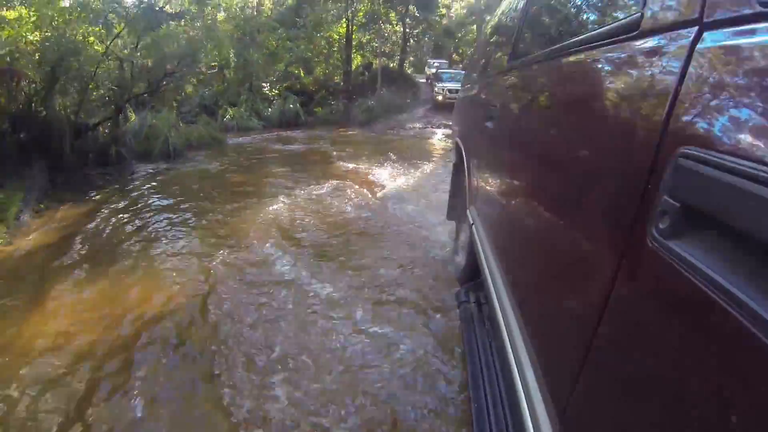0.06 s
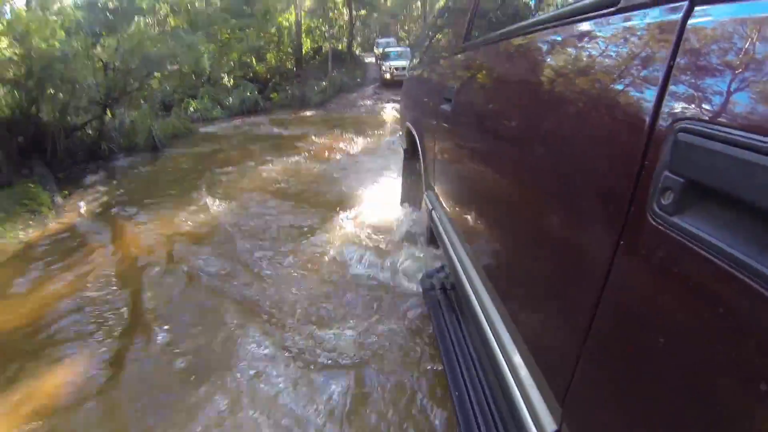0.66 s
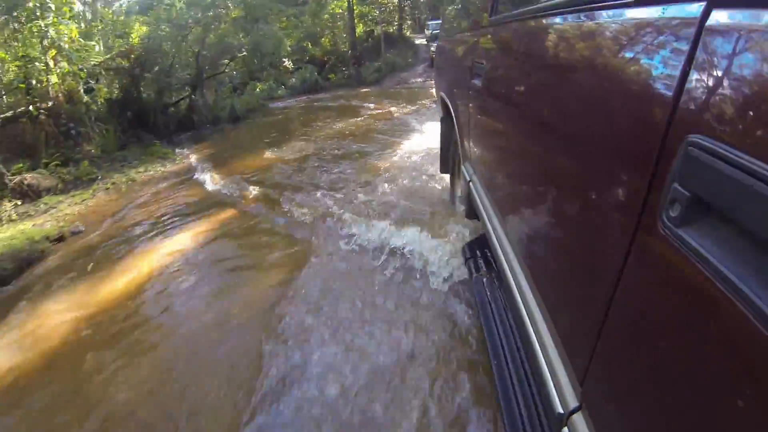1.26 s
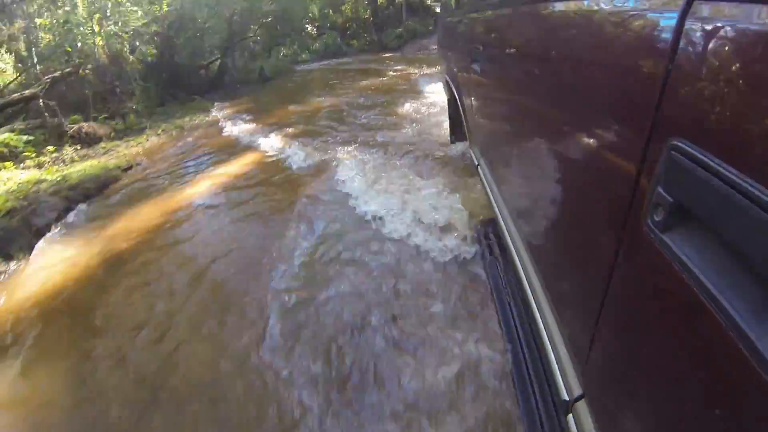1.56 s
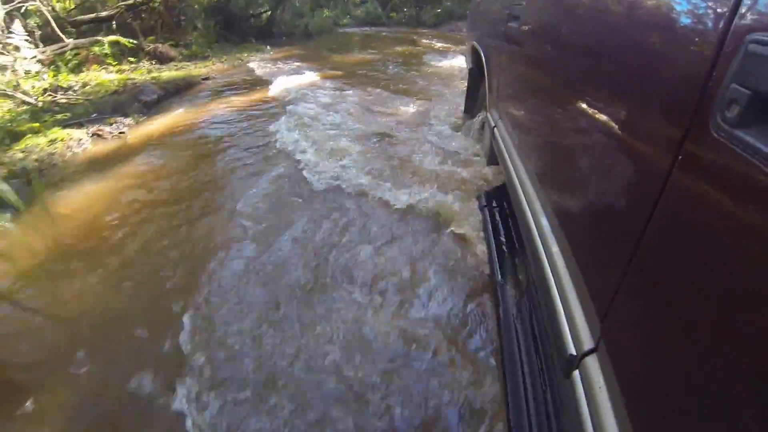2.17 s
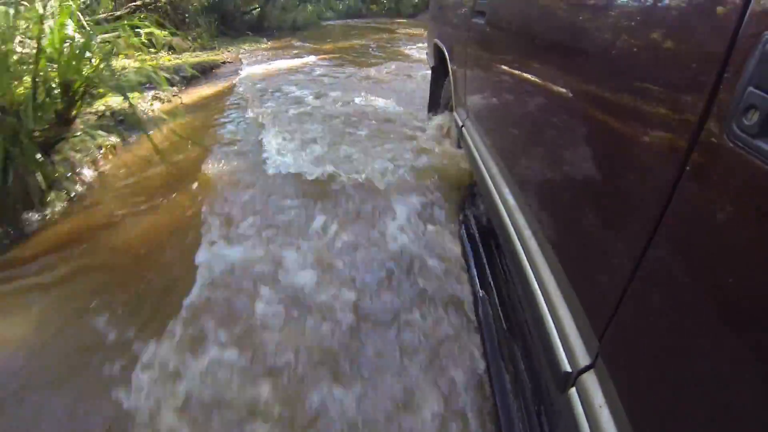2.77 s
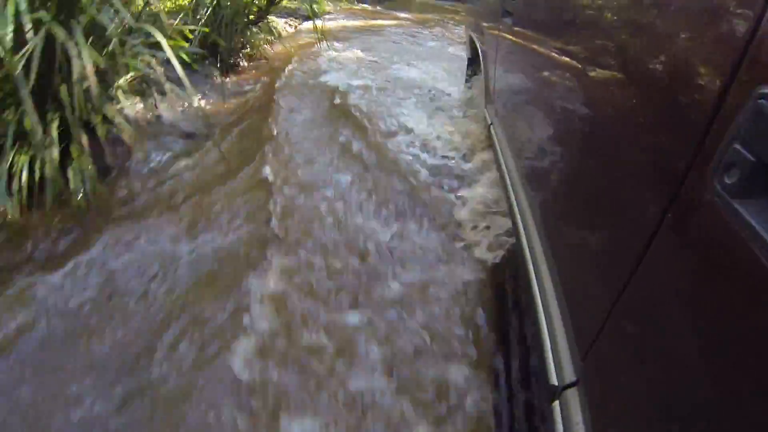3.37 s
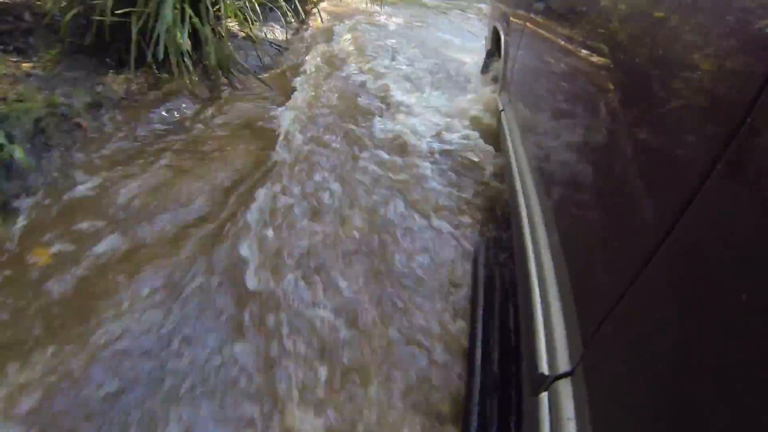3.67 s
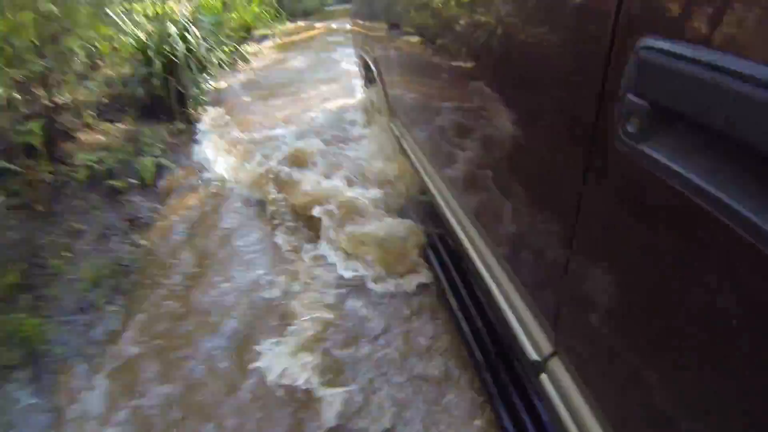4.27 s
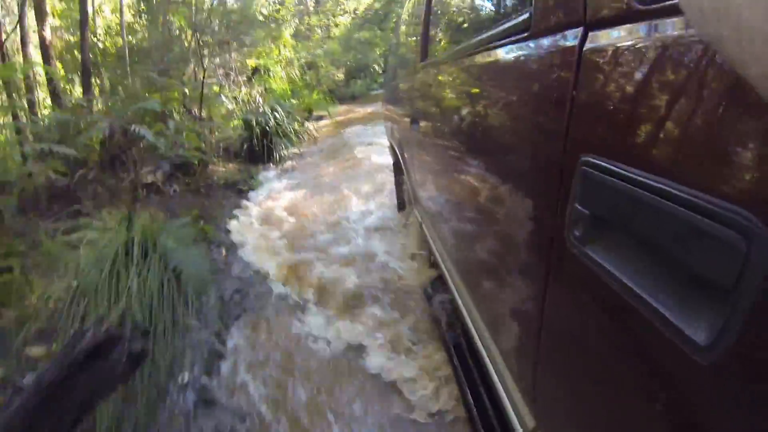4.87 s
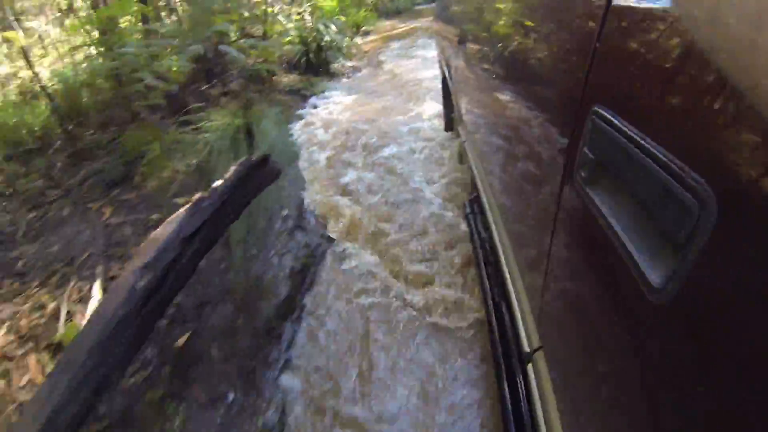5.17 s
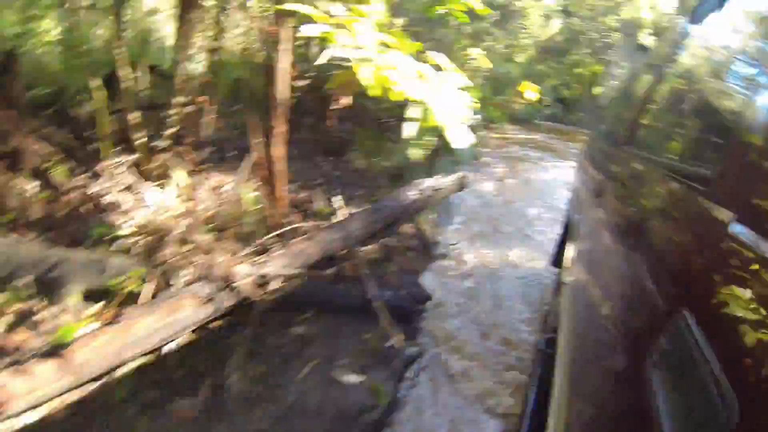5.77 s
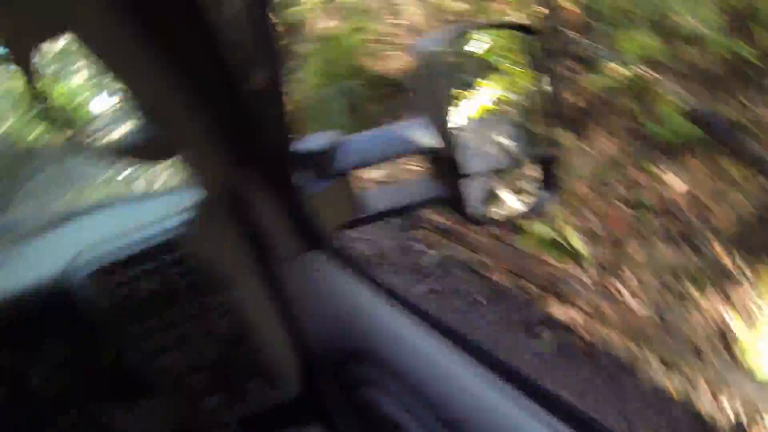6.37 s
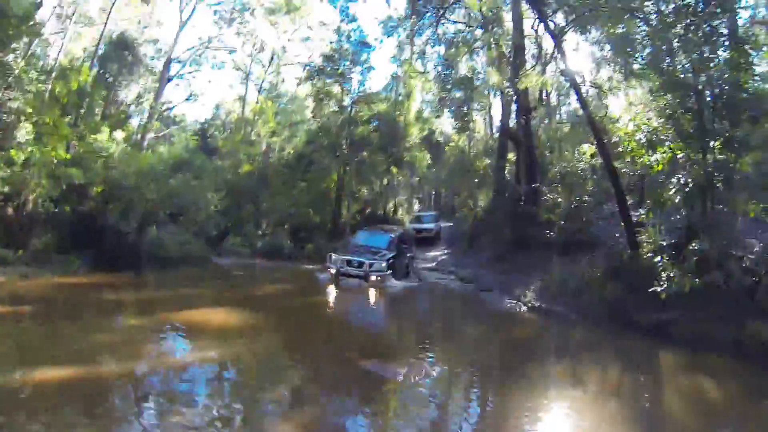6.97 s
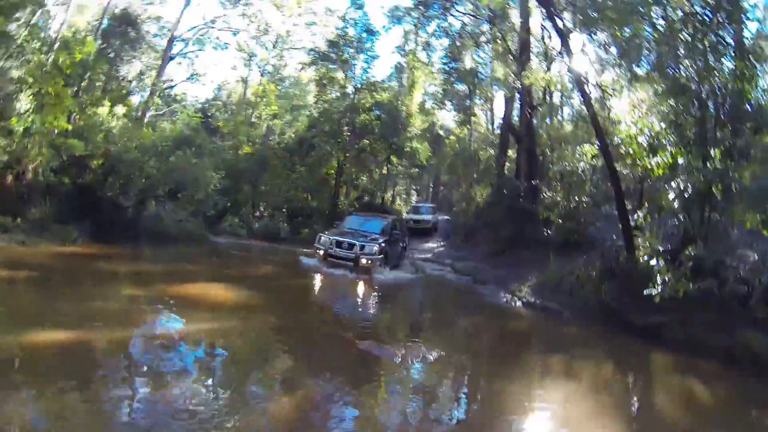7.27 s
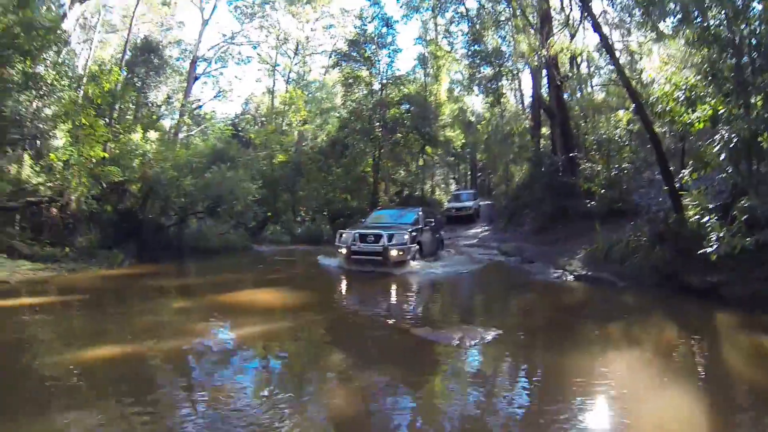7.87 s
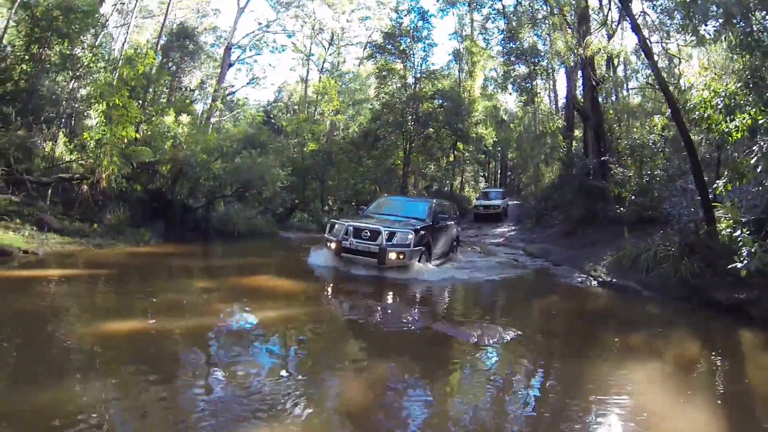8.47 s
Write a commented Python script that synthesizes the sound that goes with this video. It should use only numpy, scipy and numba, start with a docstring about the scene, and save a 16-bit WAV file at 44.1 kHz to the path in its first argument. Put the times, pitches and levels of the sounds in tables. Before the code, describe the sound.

Close V8 exhaust rumble, churning water and wind buffeting, cut off by a click, then another vehicle wading closer, heard from the bank.

```python
"""A V8 four-wheel drive wades through a creek, its uneven exhaust beats booming through the body.
The wheels churn up bubbles and spray. We listen from a plastic case held out of the window:
wind thumps on it, drops tick on it, and fingers tap it as it is drawn into the cab.
After a click the scene changes to the bank, where the next vehicle drones closer, pushing a bow wave."""
import sys
import numpy as np
from scipy import signal
from scipy.fft import rfft, irfft, next_fast_len
from scipy.io import wavfile
from scipy.ndimage import uniform_filter1d
from numba import njit

SR = 44100
rng = np.random.default_rng(int(sys.argv[2]) if len(sys.argv) > 2 else 0)


def bounce(signal):
    """Save signal as a 16-bit WAV file at the path given by the first command-line argument."""
    frames = np.transpose(np.atleast_2d(signal))
    limited = np.clip(frames, -1, 1)
    pcm = np.round(limited * 32767).astype(np.int16)
    wavfile.write(sys.argv[1], SR, pcm)


N = 384552
TIME = np.arange(N) / SR
RIDE_END_S, BANK_START_S = 6.743, 6.755
TOP_HZ = 15000

# The V8's speed. Each row: time in seconds, firings per second.
ENGINE_REVS = [(0, 70.25), (.2, 88.6), (.4, 99.3), (.65, 91.6), (.95, 59.2), (1.5, 50.64), (1.98, 48.32),
               (2.36, 109), (2.6, 109.8), (2.8, 114.7), (3, 109.4), (3.3, 94.3), (3.66, 112.6),
               (4.1, 90.44), (4.3, 77.84), (4.93, 66.04), (5.32, 95.54), (5.6, 95.4), (5.95, 104.2),
               (6.4, 91.8), (6.72, 89.5)]
# The exhaust's tones. Each row: multiple of the engine cycle (eight firings),
# relative level in dB when burbling, the same when running evenly.
EXHAUST_TONES = [(3.0, -12.5, -19), (4.0, -60.5, -28), (5.0, 4, -5), (6.0, -10.5, -15), (7.0, -29, -33.5),
                 (8.0, -0.5, 6.5), (9.0, -3, -51), (10.0, -1.5, -46.5), (11.0, -12, -4),
                 (12.0, -24.5, -10.5), (13.0, -2.5, -9.5), (14.0, -13, -24.5), (15.0, -5.5, -58.5),
                 (16.0, -3, -19), (17.0, -30, -10), (18.0, -7.5, -44.5), (19.0, -26.5, -43),
                 (20.0, -12.5, -32.5), (21.0, -35, -10.5), (22.0, -15.5, -16), (23.0, -21.5, -31),
                 (24.0, -17, -25), (25.0, -16.5, -40), (26.0, -18, -29)]
# How the exhaust and body boom. Each row: frequency in Hz, boost in dB.
BODY_BOOM = [(20, -21.5), (40, -1), (57, -2), (75, -9), (105, 9), (125, -5.5), (150, -7.5), (185, 5),
             (210, -11.5), (240, -17), (295, -3), (350, -27.5)]
# The foot eases off the throttle. Each row: time in seconds, half length in seconds, dip in dB.
THROTTLE_LIFTS = [(3.047, 0.11, 6.5), (3.553, 0.028, 10), (4.293, 0.029, 5)]
# The case moves in through the window. Each row: time in seconds, share inside the cab from 0 to 1.
INSIDE_CAB = [(6.15, 0.03), (6.35, 1)]
# The tone of the engine's rasp. Each row: frequency in Hz, relative level in dB.
RASP_TONE = [(120, -7), (260, 6.5), (450, -10), (900, -19.5), (1900, -9.5), (3500, -22), (8000, -45)]
EXHAUST_DB, CRUISE_HZ, DB_PER_OCTAVE, DB_PER_OCTAVE_PER_S = -15, 100, 3.5, 0.76
# The cylinders sound even in one range of speeds, and during one hard pull.
EVEN_HZ, EVEN_WIDTH_HZ, EVEN_SHARE, LEAST_EVEN = 70.8, 11.1, 0.84, 0.078
PULL_START_S, PULL_END_S, PULL_EDGE_S, PULL_EVEN = 2.37, 3.03, 0.039, 0.67

# The wheels plough into deeper water. Each row: start, length, build-up time and collapse time
# in seconds, then relative churn and spray levels in dB.
WATER_SURGES = [(-.1, 0.097, 0.025, 0.068, -29.5, -33), (0.257, 0.41, 0.14, .1, -34.5, -38),
                (.53, 0.45, .14, .1, -29.5, -30), (0.81, 0.64, 0.089, 0.081, -21.5, -23),
                (1.398, 0.43, 0.13, 0.16, -20.5, -21.5), (2.898, 0.38, 0.12, 0.057, -27.5, -31),
                (3.299, .63, 0.16, .1, -34, -36), (3.873, 0.35, 0.095, 0.04, -28, -30),
                (4.265, 0.67, 0.047, 0.072, -29, -30), (5.15, 0.65, 0.065, .14, -38, -38.5),
                (5.98, 0.46, .15, .04, -40, -41)]
# Waves slap and break. Each row: time and half length in seconds, relative churn and spray levels in dB.
WAVE_SLAPS = [(0.694, 0.015, -23, -32), (1.125, 0.039, -21, -38), (1.408, 0.044, -21.5, -29),
              (1.982, 0.014, -22.5, -29), (3.184, 0.017, -24.5, -30), (3.434, 0.03, -34, -32.5),
              (4.205, 0.015, -29, -30), (6.844, 0.024, -32, -37.5), (6.914, 0.022, -27.5, -30.5)]
# The tone of churn and spray, at the wheels and from the bank. Each row: frequency in Hz, relative dB.
WHEEL_CHURN_TONE = [(60, -27), (150, 3), (300, -1), (600, -2), (1000, -4), (1500, -19), (2500, -25),
                    (5000, -47.5)]
WHEEL_SPRAY_TONE = [(500, -1), (1100, -6), (1700, 0.5), (2500, -5.5), (4300, -17), (6300, -28), (7200, -33),
                    (12000, -38), (15000, -43.5)]
BANK_CHURN_TONE = [(60, -1), (150, -5), (280, -2.5), (600, -3.5), (1000, -5), (1500, -14.5), (2500, -31),
                   (5000, -49)]
BANK_SPRAY_TONE = [(500, -2), (1100, -9.5), (1700, 3.5), (2500, -5), (4000, -15.5), (7000, -33.5),
                   (9000, -33.5), (11000, -51), (15000, -49)]
# Big bubbles. Each row: start in seconds, level in dB, pitch in Hz, cycles to fade, glide in octaves.
WATER_PLOPS = [(1.435, -6, 186, 12, -.22), (3.183, -12, 300, 7.8, 0.15), (5.101, -17, 885, 6.5, 0.23),
               (6.836, -31.5, 3393, 15.7, -.05), (6.9637, -15.5, 2970, 16, 0.2),
               (7.112, -21.5, 890, 25, .9), (7.4426, -18.5, 1850, 20, .34), (7.459, -15, 2560, 20, .51),
               (8.31, -7.5, 114, 6.1, -0.18)]

# The next vehicle's engine speed. Each row: time in seconds, firings per second.
NEXT_VEHICLE_REVS = [(6.8, 52.06), (7.18, 43.23), (7.4, 53.2), (7.75, 53.35), (8.19, 61.7), (8.5, 50),
                     (8.72, 52)]
# Its exhaust tones. Each row: multiple of the firing rate, relative level in dB.
NEXT_VEHICLE_TONES = [(1, -0.5), (1.5, -22.5), (2, -13.5), (2.5, -26), (3, -21)]

# Gusts hit the case. Each row: time in seconds, half length in seconds, level in dB.
WIND_GUSTS = [(0.949, 0.24, -26), (1.553, 0.91, -23.5), (3.126, 0.13, -23.5), (3.597, .1, -26),
              (4.129, 0.18, -18.5), (4.934, 0.3, -23), (6.416, 0.23, -19), (7.104, .15, -52),
              (8.498, 0.43, -29)]
# The tone of the wind. Each row: frequency in Hz, relative level in dB.
WIND_TONE = [(10, -11), (24, 1.5), (36, -4.5), (55, -5), (100, -1), (200, -17.5), (400, -37.5),
             (1000, -72.5)]
# Fingers tap the case. Each row: start in seconds, relative level in dB.
FINGER_TAPS = [(5.899, -28), (6.2303, -28.5), (6.457, -6.5)]
# The tones of one tap. Each row: pitch in Hz, relative level in dB, cycles to fade, glide in octaves.
TAP_TONES = [(908, -2.5, 13.4, 0.41), (1280, 3, 9.8, 0.42), (1850, 1, 10.9, -0.73)]
# Rubbing on the case. Each row: time and length in seconds, level in dB, centre in Hz, graininess in dB.
CASE_RUSTLES = [(5.389, .06, -62, 4000, 1), (5.774, 0.06, -58, 4077, 2), (6.33, .05, -64, 5000, 2),
                (6.697, 0.053, -29.5, 1080, 1.5), (6.93, .025, -49, 3337, 8), (7.323, 0.037, -48, 3230, 9),
                (7.46, 0.006, -48, 3970, 5)]
# Where the case rings. Each row: frequency in Hz, width in Hz, boost in dB.
CASE_RESONANCES = [(950, 240, 3.5), (1810, 380, 6.3), (3080, 600, 6.3), (5080, 380, 7.5), (8480, 560, 10.5),
                   (10650, 800, 9)]


def v8_exhaust(inside, cab_hz=57, cab_db=8, smear=1.07):
    """Two uneven rows of cylinders make many tones; each booms as it passes a resonance."""
    firing_hz, level_db, even = engine_state(inside)
    cycle_hz = firing_hz / 8
    phase = 2 * np.pi * np.cumsum(cycle_hz) / SR + .012 * (1 - even) * wander(14)
    out, power = 0, 0
    for multiple, burble_db, even_db in EXHAUST_TONES:
        hz = multiple * cycle_hz
        db = burble_db * (1 - even) + even_db * even + level_at(BODY_BOOM, hz)
        cab_boom_db = cab_db * inside / (1 + (4 * (hz / cab_hz - 1)) ** 2)  # the cab's air booms too
        gain = from_db(db + cab_boom_db)
        waver_db = .3 + (1 - even) * (multiple != 8)  # the firing note is the steadiest
        lag = smear * multiple ** 2  # the long pipe delays high tones more, spreading each beat
        out = out + gain * from_db(waver_db * wander(13)) * np.cos(multiple * phase - lag)
        power = power + gain ** 2 / 2
    return out / np.sqrt(power) * from_db(level_db), phase


def engine_state(inside, cab_loss_db=-1.5, response_s=0.04):
    """Firing rate, level and evenness: the engine is louder when it runs fast or speeds up."""
    hz = curve(ENGINE_REVS)
    octaves = np.log2(hz / CRUISE_HZ)
    speeding_up = uniform_filter1d(np.gradient(octaves) * SR, int(response_s * SR))
    db = EXHAUST_DB + DB_PER_OCTAVE * octaves + DB_PER_OCTAVE_PER_S * speeding_up + cab_loss_db * inside
    db = db - sum(dip_db * swell(s, half_s) for s, half_s, dip_db in THROTTLE_LIFTS)
    pull = smooth_step(PULL_START_S, PULL_EDGE_S) - smooth_step(PULL_END_S, PULL_EDGE_S)
    even = LEAST_EVEN + EVEN_SHARE * np.exp(-((hz - EVEN_HZ) / EVEN_WIDTH_HZ) ** 2) + PULL_EVEN * pull
    return hz, db, np.clip(even, 0, 1)


def engine_rasp(phase, level_db=-46, depth=0.77):
    """The valves and air intake rasp once per firing."""
    rasp = colour(rng.standard_normal(N), RASP_TONE)
    return from_db(level_db) * rasp * (1 + depth * np.cos(8 * phase))


def wheel_wash(steady_churn_db=-40, steady_spray_db=-45.5, drain_share=0.19, drain_s=0.17):
    """Power of churn and spray at the wheels: each surge builds, holds, collapses and drains away."""
    churn, spray = from_db(steady_churn_db) ** 2, from_db(steady_spray_db) ** 2
    for start, length, build_s, collapse_s, churn_db, spray_db in WATER_SURGES:
        age, after = np.maximum(TIME - start, 0), np.maximum(TIME - start - length, 0)
        fall = (1 - drain_share) * np.exp(-after / collapse_s) + drain_share * np.exp(-after / drain_s)
        shape = (1 - np.exp(-(age / build_s) ** 2)) * fall
        churn = churn + (from_db(churn_db) * shape) ** 2
        spray = spray + (from_db(spray_db) * shape) ** 2
    return churn, spray


def add_slaps(churn, spray):
    """Breaking waves add to the power of churn and spray; both come back in dB."""
    for s, half_s, churn_db, spray_db in WAVE_SLAPS:
        shape = swell(s, half_s)
        churn = churn + (from_db(churn_db) * shape) ** 2
        spray = spray + (from_db(spray_db) * shape) ** 2
    return 10 * np.log10(churn), 10 * np.log10(spray)


def water(powers, churn_tone, spray_tone, churn_db, spray_db, foam_db, slosh_db):
    """Big bubbles churn and small drops fizz over hissing foam; both swell with each slosh."""
    churn_level, spray_level = add_slaps(*powers)
    slosh = slosh_db * wander(24)
    churn = bubbles(155, 2198, cycles=11.5, spread_db=0.5, count=18000)
    churn += from_db(foam_db) * rng.standard_normal(N)
    spray = bubbles(994, 13500, cycles=19, spread_db=3.5, count=36000)
    spray += from_db(foam_db + 1) * rng.standard_normal(N)
    churn_gain = from_db(churn_level + churn_db + slosh + 0.2 * wander(49))
    spray_gain = from_db(spray_level + spray_db + 0.46 * slosh + 0.76 * wander(60))
    return colour(churn, churn_tone) * churn_gain + colour(spray, spray_tone) * spray_gain


def bubbles(low_hz, high_hz, cycles, spread_db, count):
    """A crowd of bubbles, many faint and a few loud, each rising in pitch as it rings."""
    when, pitch, size, life = rng.random((count, 4)).T
    hz = low_hz * (high_hz / low_hz) ** pitch
    loudness = from_db(-spread_db * np.log(1 - .985 * size)) * hz / low_hz
    return normalise(ring(when * N / SR, loudness, hz, cycles * (.5 + life), np.full(count, .25)))


def plops():
    """Single big bubbles ring briefly; the lowest are gulps."""
    starts, db, hz, cycles, octaves = np.array(WATER_PLOPS, float).T.copy()
    return ring(starts, from_db(db), hz, cycles, octaves)


def next_vehicle(base_db=-25.5, cruise_hz=52, db_per_octave=10, waver_db=4.5):
    """The next vehicle's exhaust drones across the water, louder as it revs and comes closer."""
    hz = curve(NEXT_VEHICLE_REVS)
    phase = 2 * np.pi * np.cumsum(hz) / SR
    note = 0
    for multiple, db in NEXT_VEHICLE_TONES:
        waver = waver_db * (multiple > 1) * wander(18)  # only the overtones waver
        note = note + from_db(db + waver) * np.cos(multiple * phase)
    return note * nearness() * from_db(base_db + db_per_octave * np.log2(hz / cruise_hz))


def bow_wave(churn_db=-34.5, spray_db=-37, deep_churn_db=5, deep_spray_db=2):
    """Power of the churn and spray ahead of the next vehicle; both grow as it reaches deep water."""
    deep = smooth_step(7.75, edge_s=0.059)
    churn = nearness() * from_db(churn_db + deep_churn_db * deep)
    spray = nearness() * from_db(spray_db + deep_spray_db * deep)
    return churn ** 2, spray ** 2


def nearness(start_m=31, m_per_s=3.24):
    """The next vehicle's sound doubles in strength each time its distance halves."""
    return start_m / np.maximum(start_m - m_per_s * (TIME - BANK_START_S), 1)


def wind(breeze_db=-37.5, flutter_db=-1.0):
    """Swirls of air thump softly on the case: gusts over a light breeze."""
    gust_power = sum((from_db(db) * swell(s, half_s)) ** 2 for s, half_s, db in WIND_GUSTS)
    strength = np.sqrt(from_db(breeze_db) ** 2 + gust_power)
    return colour(rng.standard_normal(N), WIND_TONE) * strength * from_db(flutter_db * wander(12))


def taps():
    """Each finger tap makes the case ring with the same few tones."""
    rings = [(start, from_db(db + tone_db), hz, cycles, octaves)
             for start, db in FINGER_TAPS for hz, tone_db, cycles, octaves in TAP_TONES]
    return ring(*np.array(rings, float).T.copy())


def drops(spray_power, per_s=14, relative_db=-15.5, spread_db=8.5, low_hz=2500, high_hz=11000, cycles=4.):
    """Stray drops tick on the case during the ride, harder when the spray is heavy."""
    count = int(per_s * RIDE_END_S)
    when, pitch, size = rng.random((count, 3)).T
    starts = when * RIDE_END_S
    spray = np.sqrt(np.interp(starts, TIME, spray_power))
    loudness = spray * from_db(relative_db - spread_db * np.log(1 - .95 * size))
    hz = low_hz * (high_hz / low_hz) ** pitch
    return ring(starts, loudness, hz, np.full(count, cycles), np.zeros(count))


def rustles(grains_per_s=250):
    """Rubbing on the case makes short, grainy swells of noise."""
    out, noise, grain = 0, rng.standard_normal(N), wander(grains_per_s)
    for s, length, db, hz, grain_db in CASE_RUSTLES:
        band = signal.butter(4, [hz / 2, min(hz * 2, TOP_HZ)], "band", fs=SR, output="sos")
        rubbing = normalise(signal.sosfilt(band, noise) * from_db(grain_db * grain))
        out = out + from_db(db) * rubbing * swell(s, length / np.sqrt(2))
    return out


def end_click(level_db=-15, rise_s=.0006):
    """The ride ends in a click: the sound wave is chopped off in mid-swing."""
    return -from_db(level_db) * np.exp(-np.abs(TIME - RIDE_END_S) / rise_s)


def cab_hum(inside, hz=337, base_db=-42):
    """A steady tone, perhaps the fan, is heard near the open window and louder inside."""
    return from_db(base_db) * np.sqrt(2 * inside) * np.sin(2 * np.pi * hz * TIME + 0.25 * wander(8))


@njit
def ring(starts, size, hz, cycles, octaves):
    """Gliding tones: each swells within about a cycle and fades by 60 dB over its cycles."""
    out = np.zeros(N)
    for k in range(len(starts)):
        start, length = int(starts[k] * SR), int(cycles[k] * SR / hz[k]) + 2
        phase, step, gain = 0., 2 * np.pi * hz[k] / SR, size[k] * 2.3
        glide, fade = 2 ** (octaves[k] / length), 1e-3 ** (1 / length)
        for i in range(max(start, 0), min(start + length, N)):
            out[i] += gain * np.sin(phase) * (1 - np.exp(-phase * phase / 40))
            phase, step, gain = phase + step, step * glide, gain * fade
    return out


def from_db(db):
    """Turn decibels into a number to multiply by."""
    return 10 ** (np.asarray(db) / 20)


def curve(table):
    """Join rows of time and value with straight lines."""
    return np.interp(TIME, *np.transpose(table))


def level_at(tone, hz):
    """Look up a tone table's level in dB at the given frequencies."""
    table_hz, db = np.transpose(tone)
    return np.interp(np.log(hz + 1e-3), np.log(table_hz), db)


def normalise(x):
    """Scale a signal to an average power of 1."""
    return x / np.sqrt(np.mean(x ** 2))


def colour(x, tone):
    """Shape a sound's lows and highs with a tone table; its average power becomes 1."""
    size = next_fast_len(N, True)
    hz = np.arange(size // 2 + 1) * SR / size
    return normalise(irfft(rfft(x, size) * from_db(level_at(tone, hz)), size)[:N])


def wander(turns_per_s):
    """A random drift up and down, about 1 in size."""
    points = rng.standard_normal(4096)
    return normalise(np.interp(TIME * turns_per_s, np.arange(len(points)), points))


def swell(s, half_s):
    """A smooth rise to 1 and fall back, around a moment."""
    return np.exp(-((TIME - s) / half_s) ** 2)


def smooth_step(s, edge_s):
    """A smooth step from 0 to 1 at a moment."""
    return .5 + .5 * np.tanh((TIME - s) / edge_s / 2)


def scene():
    """The ride through the creek, then the next vehicle heard from the bank."""
    inside = np.clip(curve(INSIDE_CAB), 0, 1)
    exhaust, phase = v8_exhaust(inside)
    churn_power, spray_power = wheel_wash()
    wheels = water((churn_power, spray_power), WHEEL_CHURN_TONE, WHEEL_SPRAY_TONE,
                   churn_db=-1, spray_db=-4.5, foam_db=5, slosh_db=1.1)
    ride = exhaust + engine_rasp(phase) + cab_hum(inside) + wheels + end_click()
    bank = next_vehicle() + water(bow_wave(), BANK_CHURN_TONE, BANK_SPRAY_TONE,
                                  churn_db=1, spray_db=-2, foam_db=8, slosh_db=1.45)
    mix = np.where(TIME < RIDE_END_S, ride, bank) + wind() + plops() + taps() + rustles()
    mix += drops(spray_power)
    # a moment of silence lies between the two scenes
    fade_times = [0, .003, RIDE_END_S - .00005, RIDE_END_S, BANK_START_S, BANK_START_S + .002]
    return (mix * np.interp(TIME, fade_times, [0, 1, 1, 0, 0, 1]))[None]


def record(dry):
    """The plastic case rings at its resonances, and the highest treble is cut off."""
    out = dry
    for hz, width, db in CASE_RESONANCES:
        out = out + (from_db(db) - 1) * signal.lfilter(*signal.iirpeak(hz, hz / width, fs=SR), out)
    return signal.sosfilt(signal.ellip(8, .2, 70, TOP_HZ, fs=SR, output="sos"), out)


dry = scene()
out = record(dry)
bounce(out)
```